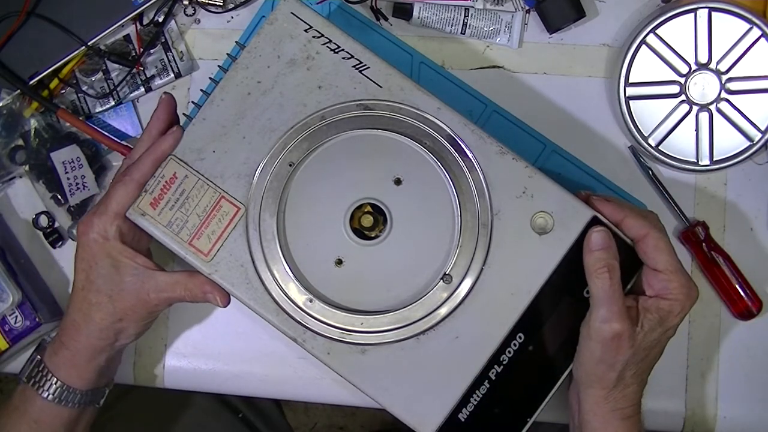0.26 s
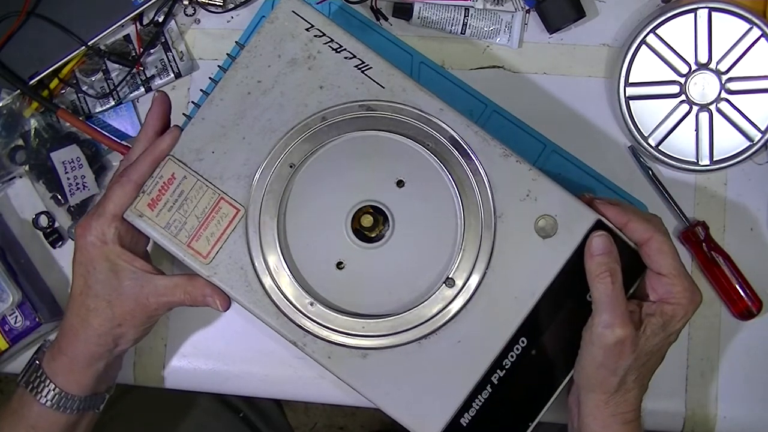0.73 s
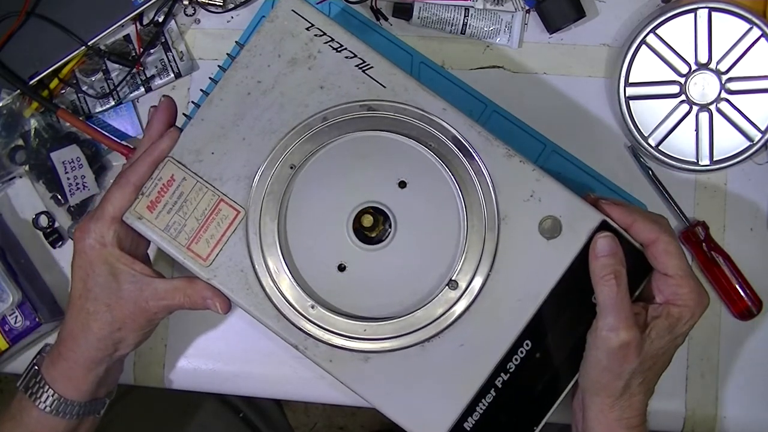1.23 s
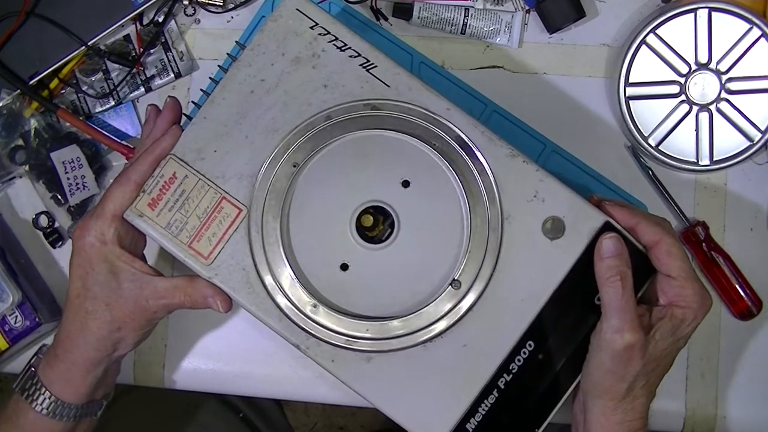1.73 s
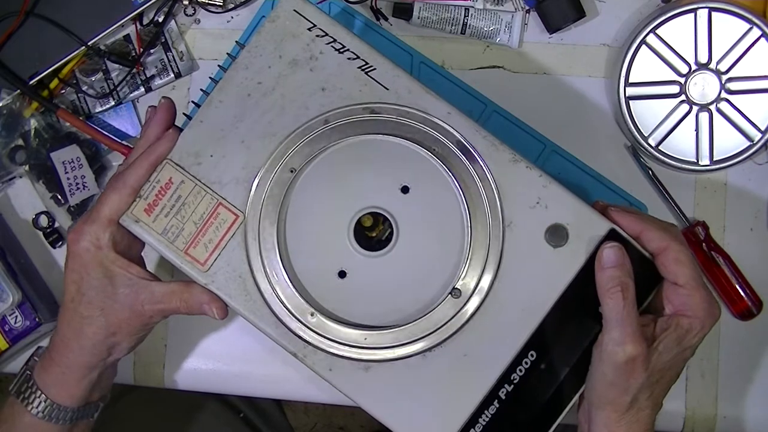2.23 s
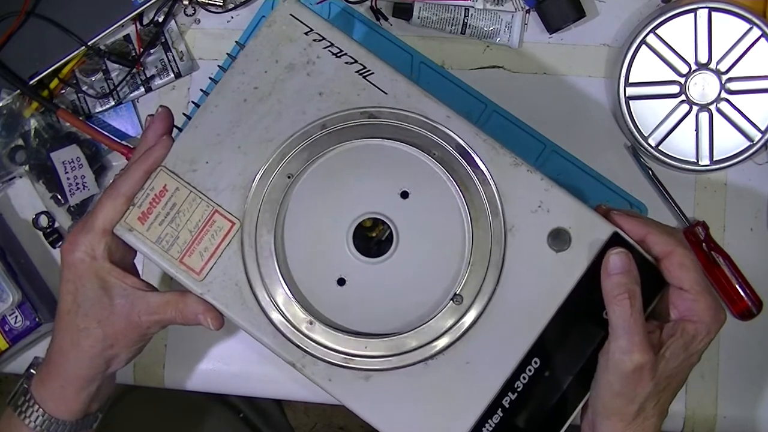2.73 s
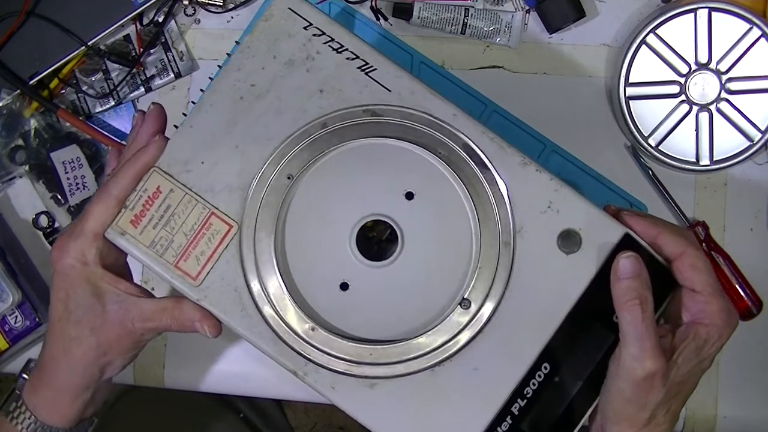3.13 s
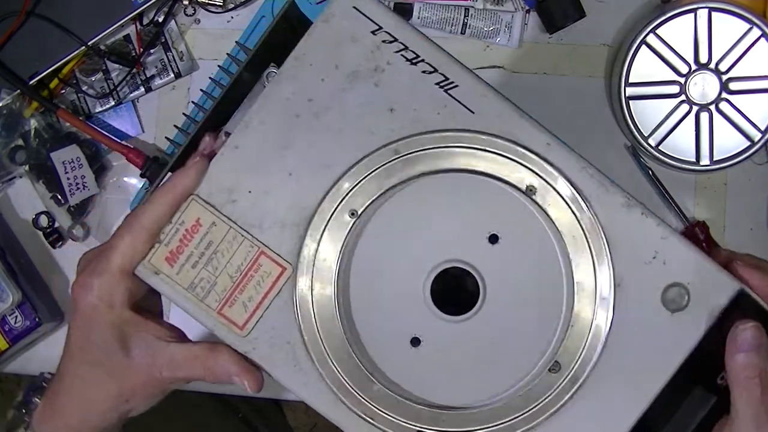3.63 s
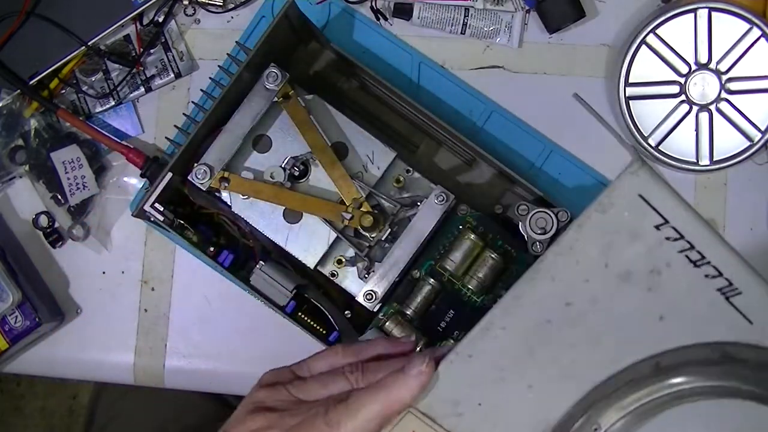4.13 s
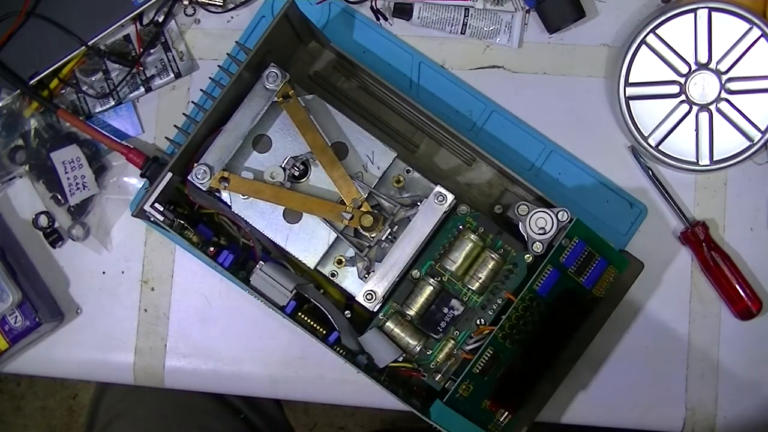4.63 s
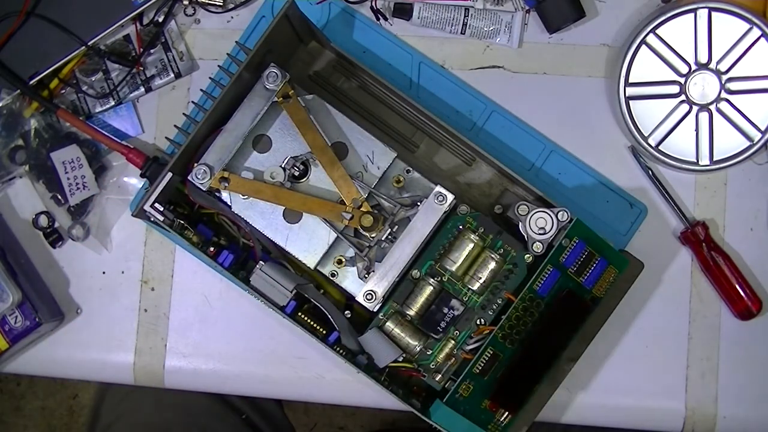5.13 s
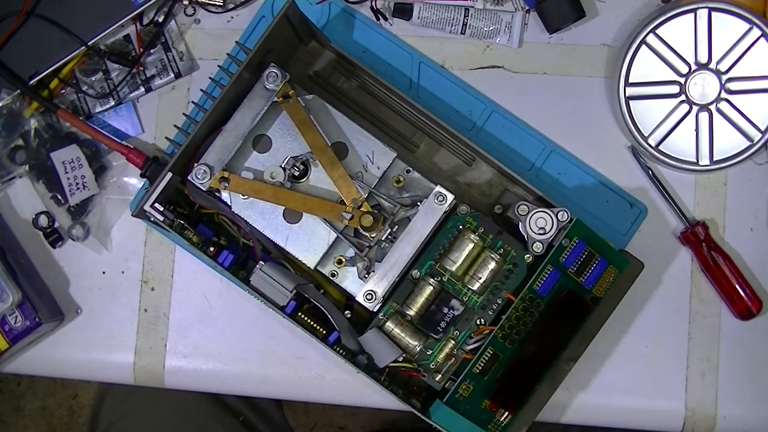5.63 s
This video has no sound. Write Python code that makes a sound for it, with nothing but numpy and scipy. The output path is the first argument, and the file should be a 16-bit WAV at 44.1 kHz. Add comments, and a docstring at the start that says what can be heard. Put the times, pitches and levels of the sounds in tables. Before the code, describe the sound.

Close, loud metallic scraping and clunking of a cast cover, with squeaks and a brief high squeal, thinning out to a faint steady room hiss.

```python
"""Close up in a small room, a die-cast metal cover is rocked loose from an instrument housing on a workbench.
First come light knocks and short scrapes, soon loud: stick-slip pulses and blows ring the modes of the casting.
Groans and hoarse squeaks join in, then a squeal near 2 kHz sings twice: wavering tones, some with overtones.
The scraping thins out, the cover lifts clear with two faint ticks, and only the quiet room is left:
shaped noise and a faint two-tone hum, which run underneath throughout."""
import sys
import numpy as np
from scipy import signal
from scipy.fft import rfft, irfft, next_fast_len
from scipy.io import wavfile
from scipy.ndimage import uniform_filter1d

SR = 44100
rng = np.random.default_rng(int(sys.argv[2]) if len(sys.argv) > 2 else 0)


def transcribe(signal):
    """Save signal, clipped to [-1, 1], as a 16-bit WAV file at the path in sys.argv[1]."""
    frames = np.atleast_2d(signal).T
    limited = np.clip(frames, -1, 1)
    pcm = np.round(limited * 32767).astype(np.int16)
    wavfile.write(sys.argv[1], SR, pcm)


N = 258778
# time axes in seconds: the whole scene, and the ring after one tap
T = np.arange(N) / SR
RING_T = T[:SR // 5]
# every swell of scrape or song fades in at least this gently
TOUCH_S = 0.004

# pushes that drag the rim along the housing: start_s, attack_s, hold_s, push level_db, swell_db over the hold,
# edge_db (sharp + or flat - contact), bench rumble_db, top panel_hz, wall mode under the rim wall_hz,
# its strength wall_db, unaffected by brightness, grit_tilt_db_per_octave
PUSHES = [(0.154, 0.0023, 0.0031, -48.5, -9, -9.5, -60, 251, 897, 1.5, 2),
          (0.399, 0.028, 0.0069, -48, -8, 4.5, -45, 420, 1396, 18, 14),
          (0.447, 0.0022, 0.0042, -37, -7, -2.5, -66, 427, 1630, 5, 2),
          (0.46, 0.032, 0.049, -40.5, -3.5, 2, -55, 416, 1436, 4.5, 12),
          (0.595, 0.038, 0.0058, -15.5, 2, -7, -45.5, 367, 1568, 3.5, 9.5),
          (0.758, 0.0017, 0.0047, -40.5, -33, 10, -68, 410, 1120, -13, 2),
          (0.859, 0.018, 0.0025, -24, -4.5, -3.5, -45, 382, 1630, 14, 0),
          (0.903, 0.03, 0.088, -34, 5.5, -1, -41.5, 418, 1666, 0.5, 8),
          (1.013, 0.01, 0.017, -22, 4, -6, -43.5, 394, 1975, 3, 5),
          (1.05, 0.026, 0.066, -42, 4, -3.5, -42.5, 416, 1630, 5, 2),
          (1.225, 0.015, 0.049, -20.5, 7.5, -8.5, -60, 368, 1490, -25.5, 7.5),
          (1.245, 0.044, 0.041, -13.5, -3, -5.5, -55, 381, 1974, -0.5, 3),
          (1.315, 0.019, 0.041, -18.5, -0.5, -5.5, -42, 401, 2450, -1.5, 9.5),
          (1.779, 0.053, 0.0013, -39, 7, -2, -55, 449, 1940, 10, 7),
          (1.825, 0.025, 0.045, -11.5, -5, -0.5, -64.5, 491, 1980, -2, 7.5),
          (1.905, 0.013, 0.024, -17.5, 1.5, -3.5, -51.5, 449, 2325, 0, 2),
          (1.948, 0.0092, 0.023, -19.5, 1.5, -5, -40, 440, 1640, -1, 0.5),
          (1.995, 0.022, 0.082, -20, 2.5, -5.5, -45, 457.5, 2297, -1, 1.5),
          (2.111, 0.035, 0.017, -29.5, -2, -3, -49.5, 426, 1373, 3.5, -4),
          (2.29, 0.012, 0.01, -36, 5, -3, -60, 454, 2100, -0.5, -1.5),
          (2.313, 0.007, 0.026, -20.5, 2.5, -6.5, -53, 474, 1207, -2.5, -11),
          (2.336, 0.035, 0.06, -18.5, -4.5, 1, -66.5, 418, 2443, 3, -1.5),
          (2.434, 0.039, 0.058, -38.5, -2.5, 2, -66, 428, 4140, -8, -1.5),
          (2.527, 0.0032, 0.013, -19, 3, -3, -49, 437, 2310, -3.5, -2),
          (2.544, 0.0093, 0.076, -18, -4, 2, -70.5, 445, 2467, -2, -6),
          (2.641, 0.045, 0.037, -33, -2.5, -1, -50, 440, 1624, -11, 6),
          (2.716, 0.015, 0.045, -35, -6, 2.5, -52, 450, 1565, 0, 10),
          (2.817, 0.0086, 0.01, -43.5, 0.5, 6, -45, 480, 1590, 9, -4),
          (2.889, 0.012, 0.044, -36, -2, 3, -40.5, 448, 1580, -0.5, 6),
          (2.947, 0.058, 0.023, -41, 1.5, 6, -49.5, 464, 4280, -11.5, 9.5),
          (3.03, 0.012, 0.084, -48, -5, 6.5, -70, 455, 1690, 3, -9),
          (3.14, 0.022, 0.0036, -42, -2.5, 4, -62, 633, 1550, 4, -15)]
# the cover working free, so the top panel stands out less and the walls ring brighter:
# time_s, panel_db before brightness, brightness_db_per_octave
LOOSENING = [(0.4, 7, -1.5), (2.1, -0.5, -1)]
# how boom, rasp and grit answer a push: db at the reference push level, db per dB of push,
# db per dB of edge, release in dB per s
REFERENCE_DB = -27
BOOM_LAW = (-28, 0.3168, -0.5, 330)
RASP_LAW = (-23, 0.9288, 0.5, 427.5)
GRIT_LAW = (-31.5, 0.85, 1.68, 381)
RUMBLE_RELEASE_DB_PER_S = 212
CLIMB_DB = 19  # a push climbs evenly in dB over its attack
SLIPS_PER_S = 380
# the rim judders under the hands; per register (rumble, boom, rasp, grit): judder depth in dB,
# and the share of its power that comes in snags
JUDDER_RATES_HZ, JUDDER_DB = (21, 52.5), (0.43, 0.34, 0.32, 1.2)
SNAG_SHARES = (0, .1, .3, .5)


def scrape():
    """In each push one train of slips shakes all registers; the hands' pressure sets how hard."""
    out = np.zeros(N)
    loosening_s, panel_dbs, brightnesses = np.transpose(LOOSENING)
    for s, attack, hold, level, swell, edge, rumble, panel_hz, wall_hz, wall_db, grit_tilt in PUSHES:
        start = int(s * SR)
        span = slice(start, start + SR * 2 // 5)
        t = T[span] - s
        released = np.maximum(t - attack - hold, 0)
        climb = from_db(CLIMB_DB * np.minimum(t / attack - 1, 0))
        rise = np.clip(t / TOUCH_S, 0, 1) * climb
        pressure = level - REFERENCE_DB + swell * np.clip((t - attack) / hold, 0, 1)

        # each register dies away at its own rate
        levels = [rumble - RUMBLE_RELEASE_DB_PER_S * released]
        for db, per_push, per_edge, release in (BOOM_LAW, RASP_LAW, GRIT_LAW):
            levels.append(db + per_push * pressure + per_edge * edge - release * released)

        force = slips(len(t), SLIPS_PER_S, unevenness=.7, spread_db=2.0, dust_db=-3.5)
        panel_db = np.interp(s, loosening_s, panel_dbs)
        brightness = np.interp(s, loosening_s, brightnesses)
        contact = (panel_hz, panel_db, brightness, [(wall_hz, wall_db)], grit_tilt)
        first_point, last_point = casting(*contact), casting(*contact)
        # the point of contact slides, so one mix of modes gives way to another
        travel = np.interp(t, [0, attack + hold], [0, np.pi / 2])
        leaving, arriving = force * np.cos(travel), force * np.sin(travel)

        judder, chatter = wobble(len(t), JUDDER_RATES_HZ), snags(len(t))
        registers = zip(first_point, last_point, levels, JUDDER_DB, SNAG_SHARES)
        for first, last, db, judder_db, share in registers:
            ringing = through(leaving, first) + through(arriving, last)
            # even out the slow level (25 ms), so the push alone sets it
            ringing /= np.sqrt(np.abs(uniform_filter1d(ringing ** 2, size=1100)) + 1e-12)
            # snags come only until the release
            snagging = np.sqrt(1 + share * (chatter - 1) * (released == 0))
            out[span] += ringing * rise * snagging * from_db(db + judder_db * judder)
    return out


def slips(size, per_s, unevenness, spread_db, dust_db):
    """Friction force: the rim catches and lets go at uneven gaps, with fine roughness in between."""
    chance = rng.standard_normal((2000, 2))
    gaps = np.exp(unevenness * chance[:, 0]) / per_s
    at = (np.cumsum(gaps) * SR).astype(int)
    # a longer stick stores more force
    sizes = np.sqrt(gaps) * from_db(spread_db * np.clip(chance[:, 1], -2, 2))
    inside = at < size
    force = np.bincount(at[inside], sizes[inside], size)
    return rms_one(force) + from_db(dust_db) * rng.standard_normal(size)


def snags(size):
    """Power of the coarse chatter: sudden catches at uneven gaps, each fading fast; mean 1."""
    fade_s = 0.0055
    catches = slips(size, per_s=150, unevenness=.5, spread_db=2.5, dust_db=-60) ** 2
    power = signal.lfilter([1], [1, -np.exp(-1 / (fade_s * SR))], catches)
    return power / power.mean()


# knocks as the cover shifts: start_s, thud peak_db, top panel_hz, hardness_db (lifts the clack, tilts the ring),
# tick_db against the thud
KNOCKS = [(0.03, -39, 401, -28, 9.5), (0.157, -32.5, 242, -6, -28), (0.187, -36, 307, -14, -35),
          (0.335, -46, 264, -4, 1), (0.366, -53, 317, 10, 3), (0.416, -29, 280, 1, -5),
          (0.43, -26.5, 318, 0, -22), (0.447, -29, 425, 9.5, -14), (0.597, -30, 360, -4.5, -3.5),
          (0.759, -22, 389, -8, -4), (0.817, -29, 404, 2.5, -10), (0.859, -13.5, 370, -3.5, -28),
          (0.968, -18, 393, 1.5, -3), (1.009, -22.5, 420, -5.5, 6.5), (1.017, -11, 428, 1.5, -18),
          (1.044, -15.5, 397, 3, -10), (1.075, -23, 424, 4, -4.5), (1.111, -22.5, 400, 2, -6.5),
          (1.6, -22.5, 484, -3, -11.5), (1.654, -46, 448, 5, 4), (1.831, -20, 466, 11.5, 1.5),
          (2.18, -30.5, 440, 4, -2), (2.317, -16.5, 470, 2, -5), (2.535, -21.5, 418, 4.5, -6),
          (2.824, -21, 479, -16, -8), (2.877, -24.5, 500, -5.5, -12), (2.912, -17.5, 473, -4.5, -5),
          (3.172, -37, 762, 13, -6), (3.541, -61, 420.6, 11, 17), (3.965, -56, 307, 12, 11)]
CLACK_DB, CLACK_FADE_S = -1.5, 0.071  # against the thud at hardness 0; damped by the hands
KNOCK_BRIGHTNESS, TILT_PER_HARDNESS = -2.5, 0.45  # dB per octave, and the same per dB of hardness
CRUNCH_S, TICK_FADE_S = 0.0039, .02  # a tick crunches for a moment as the edges seat, then fades


def knocks(panel_db):
    """Single blows ring the same casting, brighter the harder the contact; too light to shake the bench."""
    out = np.zeros(N)
    for s, thud_db, panel_hz, hardness, tick_db in KNOCKS:
        at = int(s * SR)
        brightness = KNOCK_BRIGHTNESS + TILT_PER_HARDNESS * hardness
        _, thud, clack, tick = casting(panel_hz, panel_db, brightness)
        clack = clack * np.exp(-RING_T / CLACK_FADE_S)
        crunch = rng.standard_normal(len(RING_T)) * np.exp(-RING_T / CRUNCH_S)
        tick = through(tick, crunch) * np.exp(-RING_T / TICK_FADE_S)
        for part, db in ((thud, 0), (clack, CLACK_DB + hardness), (tick, tick_db)):
            out[at:at + len(part)] += from_db(thud_db + db) * part / np.abs(part).max()
    return out


# modes of the casting: pitch_hz, width_hz, level_db before brightness and scatter
COVER_MODES = [(72.4, 12, -10), (132, 25, -16.5), (235.9, 12, -4.5), (259.4, 31, -12.5), (352.9, 16, -10),
               (420.2, 8.6, -2.5), (491, 26, -3.5), (520, 36, -8.5), (1063, 120, -15.5), (1172, 17, -6),
               (1455, 15, -8), (1565, 20, -9.5), (1630, 27.1, -7.5), (1785, 27, -9), (1924, 18, -5.5),
               (2095, 25, -4.5), (2265, 19, -7), (2429, 27, -9.5), (2513, 24, -12), (2850, 30.4, -16.5),
               (3167, 64, -21), (3424, 22, -17), (3510, 14, -23.5), (4340, 54, -24), (6316, 64, -28)]
# the crowd of weaker modes between them: pitch_hz, density level_db before brightness and shell_db
SHELL = [(50, -20), (105, -41.5), (190, -12.5), (250, -14), (310, -18.5), (420, -9.5), (680, -11),
         (950, -9.5), (1600, -0.5), (3450, -6), (3900, -15), (6300, -26.5), (9500, -34.5), (15500, -55.5)]
# four registers, rumble, boom, rasp and grit: low_hz, high_hz
REGISTERS = [(58, 180), (180, 700), (700, 4500), (4500, 15600)]
# 60 dB decay of the weaker modes in each register: t60_s
SHELL_T60_S = [0.28, 0.099, 0.33, 0.19]
PANEL_WIDTH_HZ, WALL_WIDTH_HZ = 20.6, 32  # top panel's main mode, and the wall mode under the rim


def casting(panel_hz, panel_db, brightness, walls=(), grit_tilt=0, shell_db=-8.5, scatter_db=3.5):
    """The cover's answer to one tap, in each register; each point of contact favours other modes."""
    def slope(hz):
        body = brightness * np.log2(np.clip(hz, 700, 4500) / 2000)
        return body + grit_tilt * np.log2(np.clip(hz, 5000, 11000) / 5000)

    hz, _, db = np.transpose(COVER_MODES)
    scatter = scatter_db * rng.standard_normal(len(hz))
    # neighbouring modes alternate in sign
    strengths = from_db(db + slope(hz) + scatter) * (-1) ** np.arange(len(hz))
    modes = strengths @ RINGS
    modes -= from_db(panel_db + slope(panel_hz)) * mode(panel_hz, PANEL_WIDTH_HZ)
    for wall_hz, wall_db in walls:
        modes += from_db(wall_db) * mode(wall_hz, WALL_WIDTH_HZ)

    shell_points = [(hz, db + slope(hz)) for hz, db in SHELL]
    crowd = from_db(shell_db) * colour(clustered(rng.standard_normal(len(RING_T))), shell_points)
    answers = []
    for sos, t60 in zip(REGISTER_FILTERS, SHELL_T60_S):
        fall = np.exp(-np.log(1000) * RING_T / t60)
        answers.append(signal.sosfilt(sos, modes + crowd * fall / np.linalg.norm(fall)))
    return answers


def mode(hz, width):
    """One mode's ring after a tap, a decaying sine with gain 1 at its centre."""
    decay = np.exp(-np.pi * width * RING_T)
    return 2 * np.pi * width / SR * decay * np.sin(2 * np.pi * hz * RING_T)


RINGS = np.array([mode(hz, width) for hz, width, _ in COVER_MODES])
REGISTER_FILTERS = [signal.butter(4, edges, "band", fs=SR, output="sos") for edges in REGISTERS]


def clustered(x):
    """Bunch a dense ring into peaks and gaps that differ from one point of contact to the next."""
    spacing_hz, unevenness_db = 85, 4.8
    hz = np.arange(spacing_hz, 9000, spacing_hz)
    uneven = unevenness_db * np.clip(rng.standard_normal(len(hz)), -2, 1.5)
    db = uneven * ((hz > 900) & (hz < hz[-1]))
    return colour(x, np.transpose([hz, db]))


# the rim binds and sings: time_s, pitch_hz, level_db before SQUEAL_DB
SQUEAL = [(2.362, 2045, -22.5), (2.393, 2017, -14.5), (2.422, 2020, -14), (2.434, 2025, -30.5),
          (2.448, 2010, -19.5), (2.488, 2030, -40), (2.505, 2050, -36.5), (2.53, 2070, -42.5)]
# then it sings again, hoarsely: time_s, pitch_hz, level_db before SQUEAL_DB
HOARSE_SQUEAL = [(2.53, 2054, -35), (2.545, 2050, -24), (2.628, 2050, -35), (2.642, 2074, -18.5),
                 (2.666, 2053, -22.5), (2.69, 2080, -46)]
# overtones of the squeal at full strength: multiple of the pitch, level_db against the fundamental
OVERTONES = [(2, -20), (3, -23), (4, -11.5)]
SQUEAL_DB = 5.5


def squeal():
    """The binding rim sings on one mode, first clear with three overtones, then hoarse with one."""
    clear = sing(SQUEAL, OVERTONES, waver_hz=6, flutter_db=1, steepness=1.7, rough=1)
    hoarse = sing(HOARSE_SQUEAL, OVERTONES[:1], waver_hz=11, flutter_db=2, rough=1.2)
    return from_db(SQUEAL_DB) * (clear + hoarse)


# the top panel groans while the rim drags steadily, or hoots as the cover tips;
# one list per groan: time_s, pitch_hz, level_db before GROAN_DB
GROANS = [
    [(0.759, 472, -39), (0.775, 413, -18.5), (0.8, 363, -29.5), (0.85, 385, -67)],
    [(0.925, 406, -27.5), (0.97, 429.6, -35), (1.005, 409.5, -21.5), (1.04, 392, -16), (1.07, 404, -35)],
    [(2.115, 441, -45), (2.135, 429.6, -40), (2.175, 457, -26), (2.215, 460, -58)],
    [(2.317, 485, -28), (2.33, 470, -20.5), (2.36, 440, -33)],
    [(2.53, 450.4, -43), (2.598, 434.8, -18.5), (2.7, 445.5, -35), (2.74, 435, -28.5), (2.8, 427, -41)],
    [(2.822, 475, -36), (2.835, 461.6, -25), (2.87, 441.7, -44), (2.9, 418, -24), (2.918, 470, -36),
     (2.96, 414, -50)],
    [(3.03, 409.4, -49), (3.06, 434, -31.5), (3.132, 442.4, -40), (3.22, 427, -73)],
]
GROAN_DB = 6


def groans():
    """The top panel's low song: gliding, wavering tones without overtones."""
    return from_db(GROAN_DB) * sum(sing(rows, [], waver_hz=7, flutter_db=1.6) for rows in GROANS)


# uneven slips at full roughness: jitter of the pitch, shimmer of the strength, and their band of rates
JITTER_HZ, SHIMMER_DB, JITTER_RATES_HZ = 17, 1.3, (90, 500)


def sing(rows, overtones, waver_hz, flutter_db, steepness=1, rough=0):
    """The slips lock on to one mode; overtones above the second harmonic grow when it sings hard."""
    s, hz, db = np.transpose(rows)
    span = slice(int(s[0] * SR), int(s[-1] * SR))
    t, out = T[span], np.zeros(N)
    waver, flutter = (wobble(len(t), [15, 90]) for _ in range(2))
    jitter, shimmer = (rough * wobble(len(t), JITTER_RATES_HZ) for _ in range(2))
    pitch = np.interp(t, s, hz) + waver_hz * waver + JITTER_HZ * jitter
    phase = 2 * np.pi * np.cumsum(pitch) / SR
    gain = from_db(np.interp(t, s, db))
    strength = (gain / gain.max()) ** steepness
    tone = np.sin(phase)
    for multiple, level in overtones:
        tone += from_db(level) * strength ** (multiple - 2) * np.sin(multiple * phase)
    ends = np.clip(np.minimum(t - t[0], t[-1] - t) / TOUCH_S, 0, 1)
    out[span] = ends * gain * from_db(flutter_db * flutter + SHIMMER_DB * shimmer) * tone
    return out


# hoarse squeaks where the slips half lock on to a wall mode: start_s, length_s, pitch_hz, glide_hz, level_db
SQUEAKS = [(0.47, 0.066, 9440, 94, -50), (0.621, 0.04, 1460, 0, -32), (0.623, 0.038, 1900, -1, -24),
           (0.626, 0.032, 3290, 4, -23), (0.628, 0.028, 4110, 10, -31), (0.621, 0.028, 4610, 3, -33),
           (0.861, 0.12, 1646, -2, -34.5), (0.92, 0.19, 6110, 101, -41), (1.015, .045, 1895, 0, -23.5),
           (1.264, 0.14, 1674, -20.5, -27), (1.33, .06, 2390, 0, -32), (1.832, 0.12, 1450, 0.5, -24),
           (1.837, .08, 3420, 6, -25.5), (1.84, .1, 2026, -1, -17.5), (1.845, .08, 6240, 4.5, -42.5),
           (1.883, 0.06, 1214, 1, -31), (2.018, .095, 1173, 55.5, -26), (2.347, 0.067, 3456, -51, -18),
           (2.529, .095, 3560, 37.5, -16.5), (2.543, .1, 2280, -4, -28), (2.551, .1, 2760, -2, -24.5),
           (2.975, .058, 6340, -8, -38), (3.055, 0.12, 3600, 52, -46)]


def squeaks():
    """Each half-locked squeak is a narrow, unsteady tone that swells, glides and fades."""
    hoarse_db, hoarse_hz = 3, 35
    out = np.zeros(N)
    for s, length, hz, glide_hz, db in SQUEAKS:
        at = int(s * SR)
        along = np.linspace(0, 1, int(length * SR))
        pitch = hz + glide_hz * (along - .5) + hoarse_hz * wobble(len(along), [30, 300])
        phase = 2 * np.pi * np.cumsum(pitch) / SR
        swell = np.sqrt(np.abs(np.sin(np.pi * along)))
        gain = swell * from_db(db + hoarse_db * wobble(len(along), [30, 300]))
        out[at:at + len(along)] += gain * np.sin(phase)
    return out


def room(x, t60, cutoff_hz):
    """A short, dull tail from the bench and the walls: decaying noise after a 6 ms gap."""
    t = T[:SR // 2]
    tail = rng.standard_normal(len(t)) * np.exp(-np.log(1000) * t / t60) * (t > .006)
    tail = band(tail, [100, min(cutoff_hz, 15000)])
    return through(x, tail / np.sqrt(np.sum(tail ** 2) * SR / 2 / cutoff_hz))


# difference between the two microphone ports for the cover: pitch_hz, level_db
WIDTH = [(60, -25), (380, -41), (950, -28), (2500, -21), (5500, -17), (14000, -36)]
# the same for the still air: pitch_hz, level_db
AIR_WIDTH = [(60, -6.5), (180, -5), (550, -4), (1650, -6), (4970, -9.5), (15000, -22)]


def ports(near, still):
    """Two close ports share nearly everything; a faint late copy and separate air set them apart."""
    late = np.interp(T - .0004, T, near)
    side = colour(late, WIDTH) + colour(air(), AIR_WIDTH)
    mid = near + still
    return np.array([mid + side, mid - side])


# faint hum of the room: pitch_hz, rms level_db
HUM = [(177.6, -70), (215.3, -70)]


def background():
    """Steady air with a faint hum of pure tones."""
    out = air()
    for hz, db in HUM:
        out += from_db(db) * np.sqrt(2) * np.sin(2 * np.pi * hz * T)
    return out


# spectrum of the still air, shape only: pitch_hz, relative density level_db
AIR = [(25, -1), (90, -6), (180, -2), (400, -3.5), (700, -6), (2500, -8.5), (6000, -11), (10000, -14.5),
       (15500, -23)]
AIR_DB = -55.7  # rms


def air():
    """Steady air of the room: shaped noise."""
    return from_db(AIR_DB) * rms_one(colour(rng.standard_normal(N), AIR))


def wobble(size, edges):
    """Random motion within a band of rates, spread about 1."""
    return rms_one(band(rng.standard_normal(SR), edges))[-size:]


def from_db(db):
    """Decibels to gain."""
    return 10 ** (np.asarray(db) / 20)


def rms_one(x):
    """Scale to unit rms."""
    return x / np.sqrt(np.mean(x ** 2) + 1e-20)


def colour(x, points):
    """Shape a sound by a (Hz, dB) spectrum, drawn straight over log frequency."""
    hz, db = np.transpose(points)
    size = next_fast_len(len(x))
    bins = np.maximum(np.arange(size // 2 + 1) * SR / size, 1)
    gains = from_db(np.interp(np.log(bins), np.log(hz), db))
    return irfft(rfft(x, size) * gains, size)[:len(x)]


def band(x, edges):
    """Causal band-pass."""
    return signal.sosfilt(signal.butter(4, edges, "band", fs=SR, output="sos"), x)


def through(x, response):
    """Pass a sound through an impulse response."""
    return signal.fftconvolve(x, response)[:len(x)]


def scene():
    """Cover and room, heard almost in mono by two close ports."""
    cover = scrape() + knocks(panel_db=10.5) + squeal() + groans() + squeaks()
    near = cover + from_db(-16.0) * room(cover, t60=0.41, cutoff_hz=4750)
    return ports(near, background())


def record(dry):
    """The loudest peaks are rounded off at full scale; the top is cut."""
    rounded = dry / (1 + dry ** 8) ** (1 / 8)
    low_pass = signal.ellip(10, .05, 60, 15750, fs=SR, output="sos")  # cutoff in Hz
    return signal.sosfiltfilt(low_pass, rounded)


dry = scene()
out = record(dry)
transcribe(out)
```